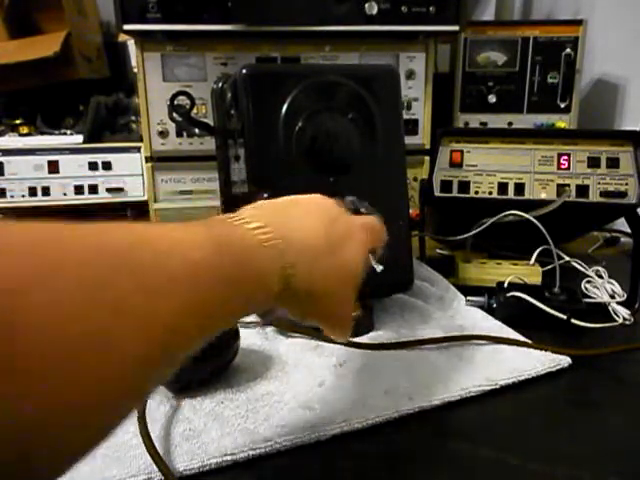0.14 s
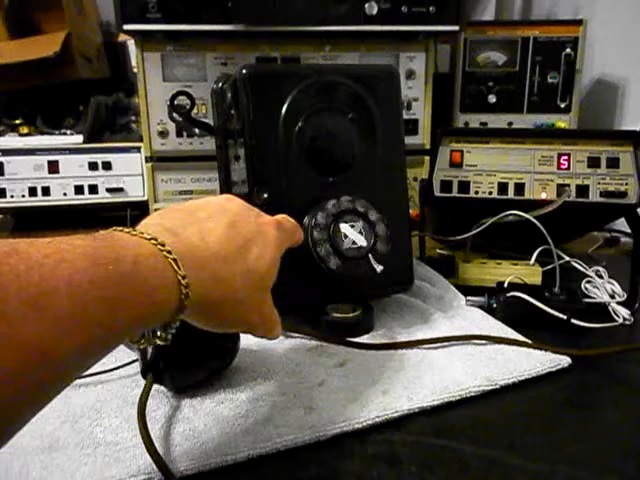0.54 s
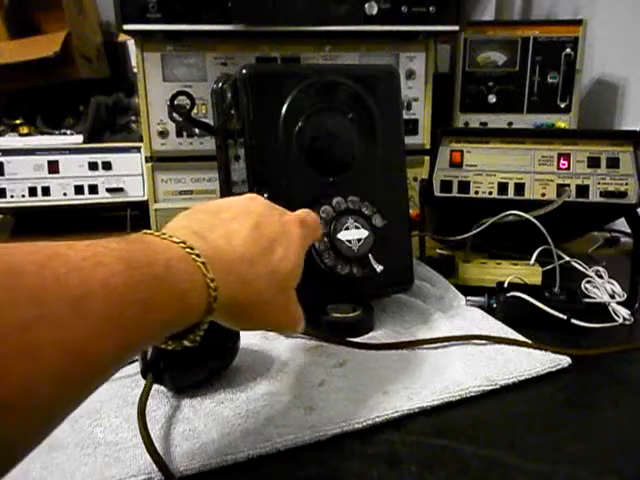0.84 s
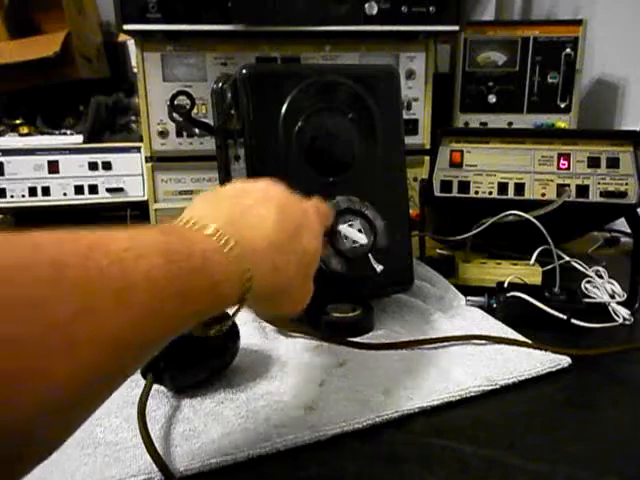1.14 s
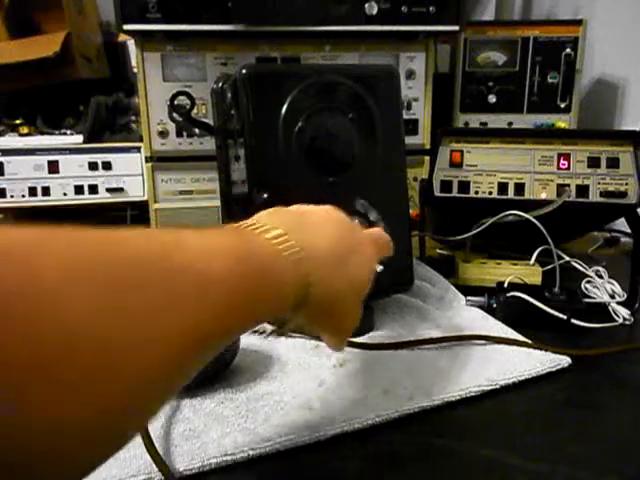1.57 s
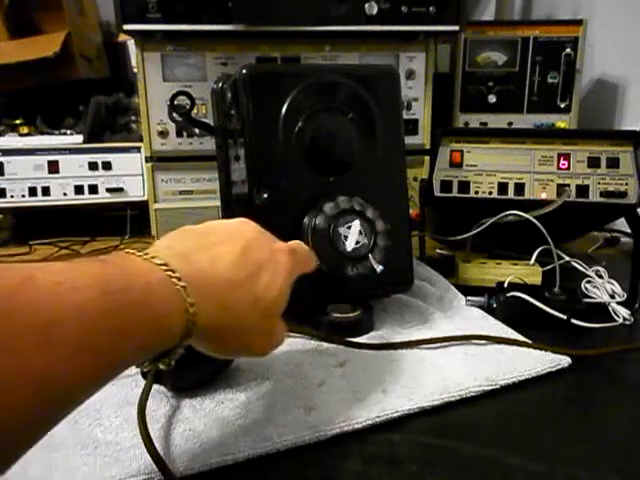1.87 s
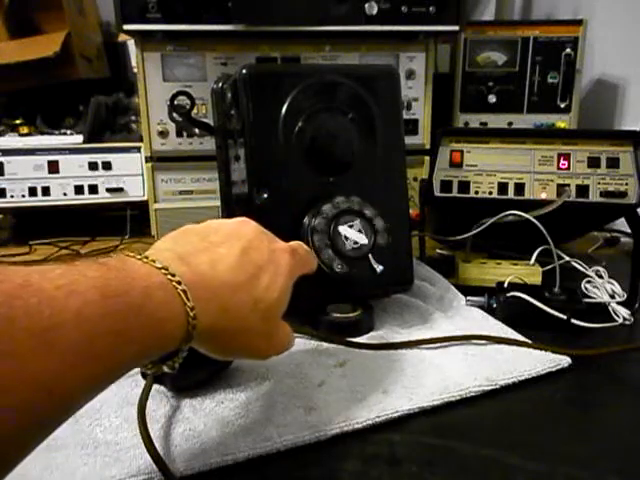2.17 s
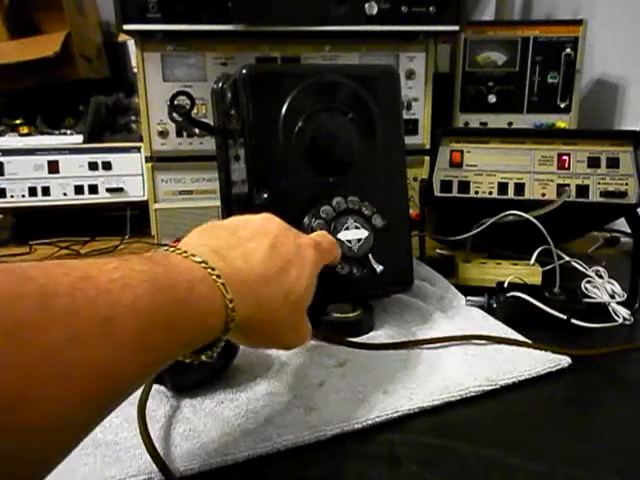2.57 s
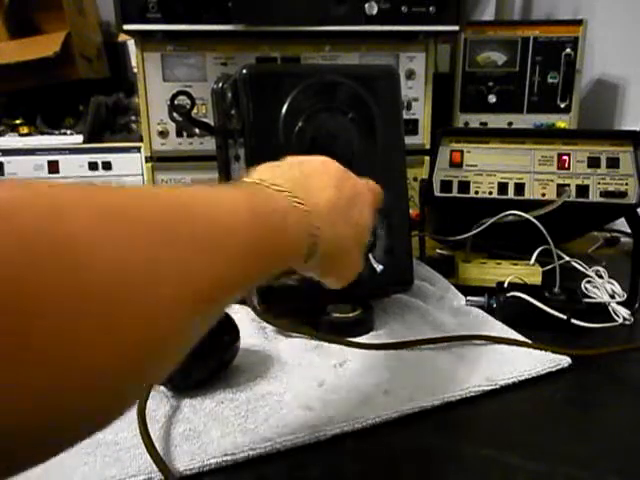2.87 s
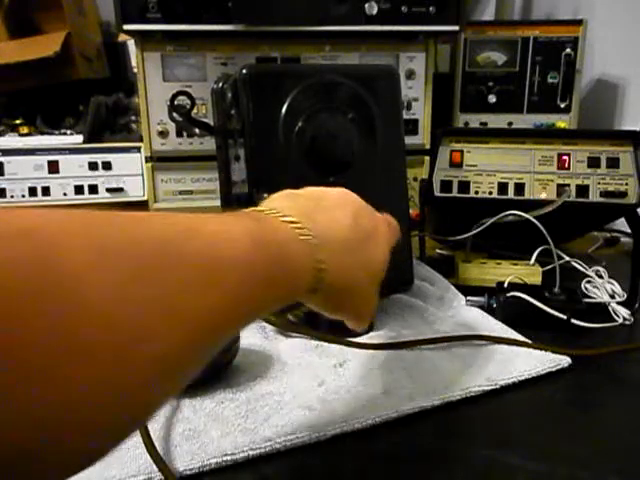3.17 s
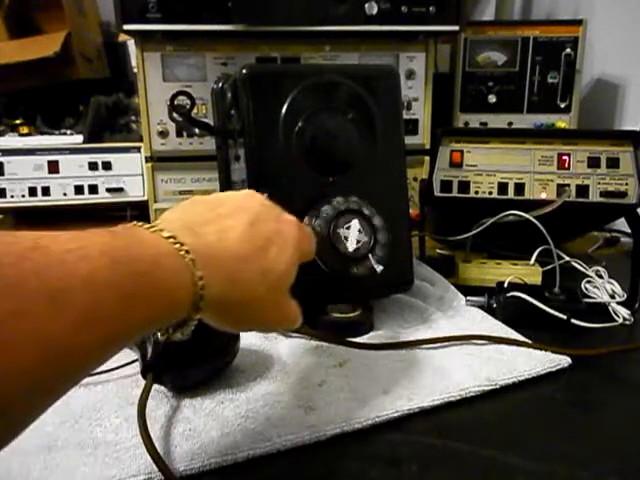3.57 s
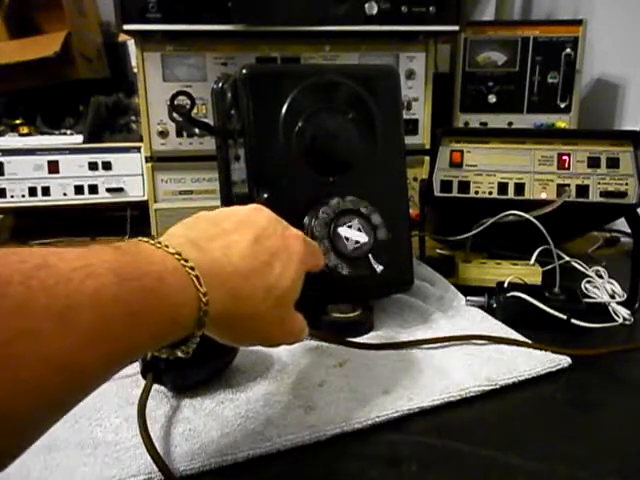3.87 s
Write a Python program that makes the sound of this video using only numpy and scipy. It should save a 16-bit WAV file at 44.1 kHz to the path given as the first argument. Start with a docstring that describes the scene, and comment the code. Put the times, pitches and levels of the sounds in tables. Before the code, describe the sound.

A rotary telephone dial whirrs home and clacks to rest, then is twice wound against its stop and released, over faint workshop hiss.

```python
"""A wall telephone's rotary dial runs home on a workshop bench, and is twice wound up and let go again.
The whirr is a row of governor beats over rattling gear teeth and rubbing shoes (shaped noise).
Ticks, clinks and knocks are short bursts of tiny contacts; wheel and case ring as dying sine waves.
The wheel strikes its stop and rebounds. The room adds reflections; the instruments hum and hiss."""
import sys
import numpy as np
from scipy import signal
from scipy.fft import rfft, irfft
from scipy.io import wavfile
from scipy.ndimage import uniform_filter1d

SR = 44100
rng = np.random.default_rng(int(sys.argv[2]) if len(sys.argv) > 2 else 0)


def store_wav(level_fs):
    """Save 16-bit WAV to argv[1]."""
    pcm = np.round(np.clip(np.atleast_2d(level_fs), -1, 1) * 32767)
    wavfile.write(sys.argv[1], SR, pcm.T.astype(np.int16))


N = 176744
TIME = np.arange(N) / SR  # seconds through the scene
AFTER = np.arange(SR // 2) / SR  # seconds after a blow
BINS = np.fft.rfftfreq(8192, 1 / SR)  # pitches in Hz at which filters are drawn

# In these tables and settings, t60 is the time in seconds for a sound to fall by 60 dB.
# The dial runs home under its spring. Each row: let go in seconds, home in seconds,
# time of one contact click in seconds, level in dB.
RETURNS = [(-.08, 0.636, 0.17, -2.5), (1.497, 2.2306, 1.670, 0), (3.095, 3.9, 3.3425, 1)]
# Colour of the gear teeth. Each row: pitch in Hz, level in dB.
TEETH = [(60, -20), (200, -2.5), (400, 2), (800, 3.5), (1500, 5), (2400, 5), (3300, -0.5), (4000, -0.5),
         (4700, 3), (5500, 2), (6300, -0.5), (7000, -1), (7500, -6.5)]
# Colour of the clinking metal. Each row: pitch in Hz, level in dB.
METAL = [(100, -29.5), (500, -17), (1000, -8.5), (2100, -4.5), (2700, -0.5), (3400, 2), (4200, -1),
         (4800, 1), (5500, -3), (6700, 4.5), (7400, -1)]
# Colour of dull thuds. Each row: pitch in Hz, level in dB.
THUD = [(20, -68.5), (100, -48), (290, -41), (450, -4), (700, -5), (880, -2), (1150, -2), (1550, -7.5),
        (1900, -19), (4000, -30), (8000, -49.5)]
# Ringing of the steel finger wheel. Each row: pitch in Hz, level in dB, t60 in seconds.
WHEEL = [(2250, -3, 0.33), (3350, 1, 0.17), (4990, -38.5, 0.083), (5040, -1, 0.06), (6100, -24, .3),
         (6700, -4, .3), (6653, -14, 0.88), (6780, 5, 0.17), (6950, 0.5, 0.22)]
# Fine colouring of the dial's sounds: narrow lifts and dips.
# Each row: pitch in Hz, width in Hz, lift in dB (minus for a dip).
FINE_COLOUR = [(399.1, 21, 10.5), (648, 54, 10), (857, 55, 7), (1118, 83, 7), (1265, 50, 3),
               (1474, 110, -5.5), (1532, 19, 6), (1655, 22, -26), (2048, 41, 5.5), (2244, 48, 1.5),
               (2570, 210, 2.5), (2550, 35, 1.5), (3047, 210, 4.5), (3400, 84, -1), (3728, 30, 6),
               (3946, 66, -24), (4580, 64, 4), (4680, 17, -9.5), (4960, 47, -1), (5380, 110, 7),
               (6120, 100, 5), (7100, 35, -3.5), (6720, 24, 8.5), (6880, 420, 4)]
FINE_DB = sum(db / (1 + (2 * (BINS - hz) / width) ** 2) for hz, width, db in FINE_COLOUR)

CONTACT_RISE_S = 0.0002  # swelling time of the chatter when hard parts strike


def amp(db):
    """Turns decibels into gain."""
    return 10 ** (np.asarray(db) / 20)


def unit(x):
    """Scales a sound to an rms level of 1."""
    return x / np.sqrt(np.mean(x ** 2) + 1e-20)


def onset_unit(x):
    """Scales a blow so that its energy, packed into 5 ms, has an rms level of 1."""
    return x * np.sqrt(SR / 200 / np.sum(x ** 2))


def read(points, hz):
    """Reads a table at the given pitches, with straight lines over log frequency."""
    f, value = np.transpose(points)
    return np.interp(np.log(hz + 1), np.log(f + 1), value)


def add(mix, s, sound):
    """Mixes a sound in at time s; whatever falls outside the scene is cut."""
    at = round(s * SR)
    sound = sound[max(-at, 0):]
    part = mix[max(at, 0):][:len(sound)]
    part += sound[:len(part)]


def colour(x, curve_db):
    """Filters with the given dB gain at each of BINS, never sounding ahead of its input."""
    both_sides_db = np.r_[curve_db, curve_db[-2:0:-1]]
    log_gain = np.log(amp(both_sides_db))
    # the Hilbert transform gives the phase that puts the response as early as possible
    response = np.exp(np.conj(signal.hilbert(log_gain)))
    taps = np.fft.ifft(response).real
    return signal.oaconvolve(x, taps[:len(BINS)])[:len(x)]


def decay(t60, t=AFTER):
    """Exponential dying away, by 60 dB in t60 seconds."""
    return np.exp(-np.log(1000) * t / t60)


def blow(spectrum, tilt_db, t60, snap, rise_s=0.0006):
    """A first contact and a swelling, dying chatter of tiny ones, with the dial's fine colouring."""
    chatter = rng.standard_normal(len(AFTER)) * decay(t60) * (1 - np.exp(-AFTER / rise_s))
    chatter /= np.linalg.norm(chatter)
    chatter[0] += snap  # the first contact
    # the contacts are brief, so their drive is even over pitch
    z = rfft(chatter)
    even = irfft(z / np.sqrt(uniform_filter1d(abs(z) ** 2, size=260)))
    even *= AFTER < AFTER[-1] / 2
    tilt = tilt_db * np.log2(1 + BINS / 500)  # tilt_db nears dB per octave well above 500 Hz
    return onset_unit(colour(even, read(spectrum, BINS) + FINE_DB + tilt))


def ring(modes):
    """Dying sine waves; neighbours start in opposite directions, so the ring swells for an instant."""
    total = np.zeros(len(AFTER))
    for k, (hz, db, t60) in enumerate(modes):
        total += (-1) ** k * amp(db) * decay(t60) * np.sin(2 * np.pi * hz * AFTER)
    return onset_unit(total)


def governor(spread_db=0.9, pulse_s=0.094):
    """The spring runs the dial home at a steady speed; every fourth beat works the pulse contact."""
    # Four beats to each contact pulse. Each row: level in dB, brightness in dB per octave.
    beats = [(-32, 0), (-39.5, -3.5), (-37.5, -1.6), (-37.5, -0.5)]
    out = np.zeros(N)
    step = pulse_s / len(beats)
    for start, home, click, run_db in RETURNS:
        first = int((start - click) / step)
        last = int((home - click) / step)
        for k in range(first, last + 1):
            db, tilt_db = beats[k % len(beats)]
            force = amp(run_db + db + spread_db * rng.standard_normal())
            beat = blow(TEETH, tilt_db, t60=0.057, snap=0.061, rise_s=0.0015)
            add(out, click + k * step, force * beat)
    return out


def turning(start, end, spin_up_s=0.025, run_down_s=0.025):
    """Speed of the gears from 0 to 1: they spin up, hold, and fall still after the end."""
    spin_up = np.clip((TIME - start) / spin_up_s, 0, 1)
    return spin_up * np.clip(1 - (TIME - end) / run_down_s, 0, 1)


def gears(grain_db=2.5, teeth_per_s=1800):
    """Uneven tooth contacts, and the governor's shoes rubbing in their cup, while the dial turns."""
    # The finger winds the dial. Each row: start in seconds, end in seconds, level in dB.
    winds = [(1.013, 1.46, -0.5), (2.532, 2.918, 1.5)]
    # Colour of the rubbing shoes. Each row: pitch in Hz, level in dB.
    rub_colour = [(100, -26.5), (380, 1.5), (550, -5.5), (700, 2), (1150, 0), (1500, 2.5), (2200, -8.5),
                  (3500, -27.5), (7500, -13.5)]
    wind_rattle_db, wind_rub_db = -45.5, -52.5
    slack_db = -34  # the teeth are quieter by this much at first, until the spring is tight
    run_rattle_db, run_rub_db = -45.5, -48
    # the shoes rub harder at the same part of every return
    drag_db, drag_before_home_s, drag_width_s = 7, 0.17, 0.078

    rattle_gain, rub_gain = np.zeros((2, N))
    for start, end, db in winds:
        motion = amp(db) * turning(start, end)
        slack = np.clip((end - TIME) / (end - start), 0, 1)
        rattle_gain += motion * amp(wind_rattle_db + slack_db * slack)
        rub_gain += motion * amp(wind_rub_db)
    for start, home, _, db in RETURNS:
        motion = amp(db) * turning(start, home)
        drag = np.exp(-((TIME - home + drag_before_home_s) / drag_width_s) ** 2)
        rattle_gain += motion * amp(run_rattle_db)
        rub_gain += motion * amp(run_rub_db + drag_db * drag)

    hits = rng.random(N) < teeth_per_s / SR
    direction = rng.choice([-1, 1], N)
    strength = amp(grain_db * np.minimum(rng.exponential(1, N), 4))
    rattle = unit(colour(hits * direction * strength, read(TEETH, BINS) + FINE_DB))
    rub = unit(colour(rng.standard_normal(N), read(rub_colour, BINS) + FINE_DB))
    return rattle_gain * rattle + rub_gain * rub


def clinks(ring_db=-14):
    """The finger wheel clinks on its hub: metal chatter plus the ring of the steel."""
    # Each row: time in seconds, level in dB, brightness in dB per octave, chatter t60 in seconds.
    clink_rows = [(-.012, -13.5, 2.5, 0.39), (1.3446, -32, -9.5, 0.05), (1.3537, -19.5, -2, 0.037),
                  (1.378, -30.5, -0.5, 0.057), (1.4439, -15.5, 1, 0.039), (3.029, -30, -4.5, 0.036),
                  (3.0405, -13.5, -.5, 0.038)]
    out = np.zeros(N)
    for s, db, tilt_db, t60 in clink_rows:
        chatter = blow(METAL, tilt_db, t60, snap=0.27, rise_s=0.0011)
        add(out, s, amp(db) * (chatter + amp(ring_db) * ring(WHEEL)))
    return out


def knocks(wheel_ring_db=-9):
    """Each blow thuds and leaves the case ringing; hard ones also crack and shake the wheel."""
    # The finger bumps the dial or drives it against the finger stop.
    # Each row: time in seconds, force in dB.
    knock_rows = [(-.012, -23), (.81, -46.5), (0.916, -45.5), (1.024, -52.5), (1.3455, -29.5),
                  (1.352, -27.5), (1.378, -33.5), (1.4784, -13.5), (2.416, -48.5), (2.55, -47.5),
                  (2.9165, -25), (3.062, -13)]
    # Colour of the sharp crack. Each row: pitch in Hz, level in dB.
    crack_colour = [(20, -38), (250, -15.5), (600, -9.5), (1700, 2.5), (2100, 1.5), (2500, 1), (3200, 4),
                    (3800, -3), (4550, 8), (5300, -2.5), (6000, -1), (6800, -1.5), (7400, -6)]
    # Ringing of the hollow case. Each row: pitch in Hz, level in dB, t60 in seconds.
    case_modes = [(592, -12, .17), (642, -4, .19), (715, 2, .08), (788, -11, .17), (838, -14, .12),
                  (950, -14, .19), (987, -14, .14), (1120, -13, .08), (1335, -14, .1), (1531, -12, .14)]
    hard_db = -13.5  # force of a full blow against the finger stop
    thud_db, ring_db, crack_db, shake_db = -17, -11.5, -11, -28  # parts of a full blow
    # dB per dB of force: the crack and shake fade fastest, so soft bumps mostly thud and ring
    thud_growth, ring_growth, crack_growth = 0.88, 1.08, 3.15
    thud_tilt_db, thud_brightening = 1.5, 0.15  # dB per octave for a full blow, change per dB of force
    shake_s = 0.032  # a hard blow makes the loose wheel clink this much later

    out = np.zeros(N)
    for s, force_db in knock_rows:
        force = force_db - hard_db  # dB relative to a full blow
        crack = blow(crack_colour, 0, t60=0.021, snap=0.074, rise_s=0.00066)
        add(out, s, amp(crack_db + crack_growth * force) * crack)
        thud = blow(THUD, thud_tilt_db + thud_brightening * force, t60=0.049, snap=0.32)
        add(out, s + 0.00052, amp(thud_db + thud_growth * force) * thud)
        add(out, s + 0.001096, amp(ring_db + ring_growth * force) * ring(case_modes))
        shake = blow(METAL, tilt_db=-6.5, t60=0.061, snap=0.27) + amp(wheel_ring_db) * ring(WHEEL)
        add(out, s + shake_s, amp(shake_db + crack_growth * force) * shake)
    return out


def home_stop(strike_db=-17, rebound_db=-13, rebound_s=0.0136):
    """A double clack as the wheel strikes its home stop, and again on the rebound."""
    # Colour of the stop. Each row: pitch in Hz, level in dB.
    stop_colour = [(100, -34), (400, -9), (700, 2.5), (1600, 4.5), (2100, 7), (3000, 4), (3700, 5.5),
                   (4100, 3.5), (4500, 3.5), (5400, 1.5), (5950, -4), (6700, 2), (7400, -3.5)]
    out = np.zeros(N)
    for _, home, _, db in RETURNS:
        strike = blow(stop_colour, tilt_db=0.66, t60=0.025, snap=0.35, rise_s=CONTACT_RISE_S)
        add(out, home, amp(strike_db + db) * strike)
        rebound = blow(stop_colour, tilt_db=4.5, t60=0.034, snap=0.54, rise_s=CONTACT_RISE_S)
        add(out, home + rebound_s, amp(rebound_db + db) * rebound)
    return out


def pawl():
    """The pawl ticks over its ratchet, mostly while the dial is wound."""
    # Each row: time in seconds, level in dB, chatter t60 in seconds.
    ticks = [(.923, -48.5, .025), (1.0342, -40.5, 0.032), (1.063, -32, 0.043), (1.079, -30.5, 0.047),
             (1.172, -40, 0.034), (1.215, -41.5, 0.054), (1.31, -44, 0.16), (2.564, -48.5, 0.096),
             (2.5938, -40, .025), (2.605, -39, 0.039), (2.652, -37.5, 0.17), (2.702, -41.5, 0.07),
             (2.749, -43.5, 0.04), (2.787, -40.5, 0.054), (2.833, -40, .028), (2.917, -38, 0.033),
             (3.02, -39, 0.046)]
    # Colour of the pawl. Each row: pitch in Hz, level in dB.
    pawl_colour = [(30, -50), (200, -24), (600, 0), (1300, 3), (1700, 1.5), (2000, 6), (2700, 1),
                   (3400, -0.5), (4000, -0.5), (4800, 0.5), (5500, -1.5), (6200, 3), (6600, -7), (7400, -6)]
    out = np.zeros(N)
    for s, db, t60 in ticks:
        tick = blow(pawl_colour, tilt_db=0.0, t60=t60, snap=0.25, rise_s=CONTACT_RISE_S)
        add(out, s, amp(db) * tick)
    return out


def clunks():
    """The mechanism clunks with a short burst of thud shortly before it gets home."""
    # Each row: time in seconds, level in dB, brightness in dB per octave.
    clunk_rows = [(2.1688, -32, 2), (3.7685, -27, 10.5)]
    out = np.zeros(N)
    for s, db, tilt_db in clunk_rows:
        add(out, s, amp(db) * blow(THUD, tilt_db, t60=0.035, snap=0.25))
    return out


def room(x, build_s=0.005, uneven_db=3):
    """Uneven reflections from bench, instruments and walls, each band dying at its own speed."""
    # Each row: pitch in Hz, t60 in seconds.
    room_decay = [(200, 0.36), (800, 0.36), (2000, 0.43), (3500, .42), (7000, 0.4)]
    taps = rng.standard_normal(len(AFTER)) * (1 - np.exp(-AFTER / build_s))
    hz, t, z = signal.stft(taps, SR, nperseg=256)
    # random levels, smoothed over pitch
    clusters = unit(uniform_filter1d(rng.standard_normal(z.shape), size=12, axis=0))
    band_decay = decay(read(room_decay, hz)[:, None], t)
    tail = signal.istft(z * amp(uneven_db * clusters) * band_decay, SR)[1]
    return signal.fftconvolve(x, tail / np.linalg.norm(tail))[:N]


def bench(hum_hz=119.4, hum_db=-62, hiss_db=-52):
    """Transformer hum, a single sine wave, and a steady hiss of coloured noise."""
    # Colour of the hiss. Each row: pitch in Hz, level in dB.
    hiss_colour = [(20, 9.5), (50, 10.5), (85, 1.5), (160, 0.5), (300, 4), (500, -2), (1000, -8),
                   (2000, -13.5), (4000, -17.5), (7000, -23.5)]
    hiss = unit(colour(rng.standard_normal(N), read(hiss_colour, BINS)))
    hum = unit(np.sin(2 * np.pi * hum_hz * TIME))
    return amp(hiss_db) * hiss + amp(hum_db) * hum


def scene(room_db=-7, case_room_db=-11):
    """The dial and its case in the workshop; the case sends less sound into the room."""
    dial = governor() + gears() + clinks() + home_stop() + pawl()
    case = knocks() + clunks()
    reflections = room(amp(room_db) * dial + amp(case_room_db) * case)
    return (dial + case + reflections + bench())[None]


def record(dry, edge_hz=9308):
    """A recorder with little top: it colours, with a notch at 8 kHz and a faint lobe above, and clips."""
    # Response of the recorder. Each row: pitch in Hz, gain in dB.
    recorder = [(15, -21.5), (45, -26), (90, -1), (6900, 1), (7300, 1.5), (7600, -8.5), (7850, -29),
                (8050, -49), (8300, -20), (8600, -16), (8950, -21.5), (9300, -37)]
    heard = np.clip(colour(dry[0], read(recorder, BINS)), -1, 1)
    low_pass = signal.firwin(511, edge_hz, window=("kaiser", 9), fs=SR)  # cuts the highs
    return signal.oaconvolve(heard, low_pass, "same")[None]


dry = scene()
out = record(dry)
store_wav(out)
```